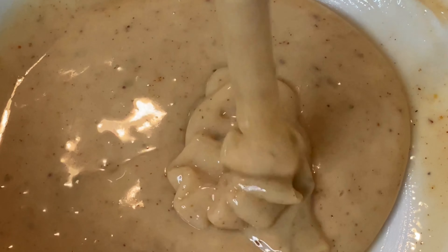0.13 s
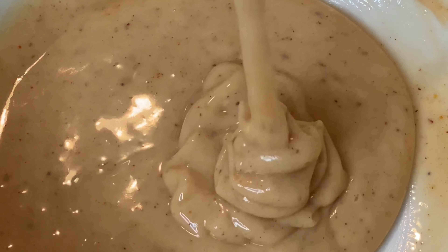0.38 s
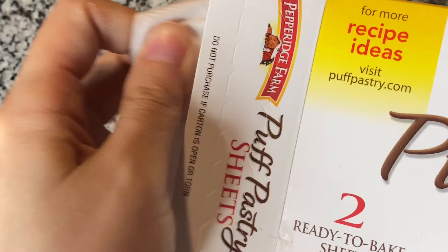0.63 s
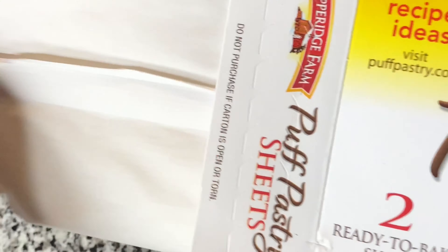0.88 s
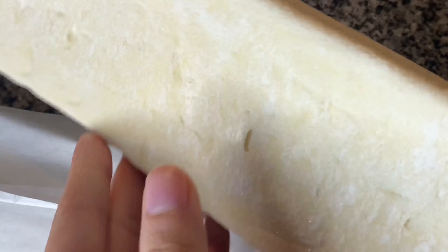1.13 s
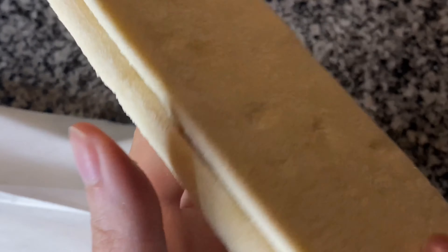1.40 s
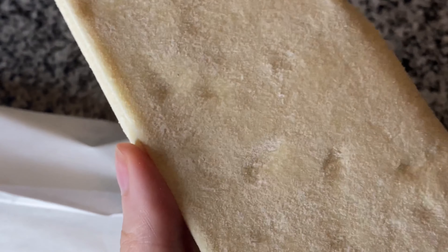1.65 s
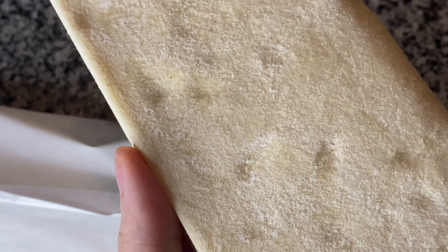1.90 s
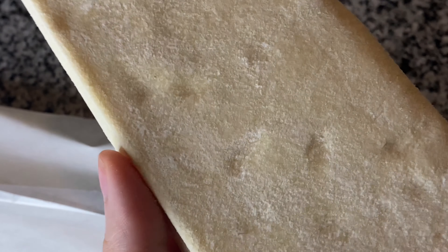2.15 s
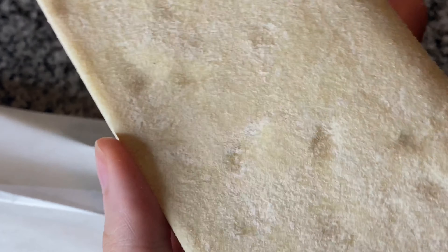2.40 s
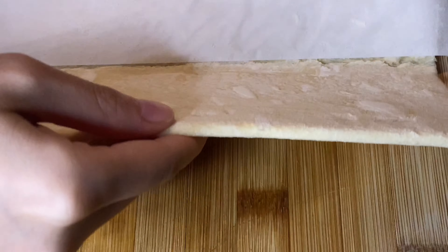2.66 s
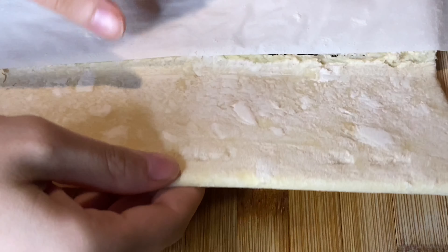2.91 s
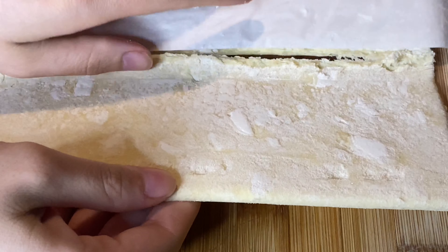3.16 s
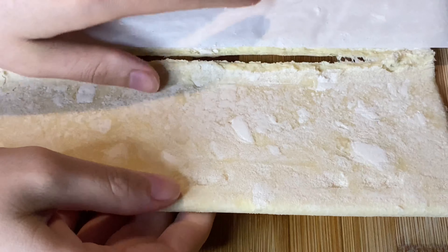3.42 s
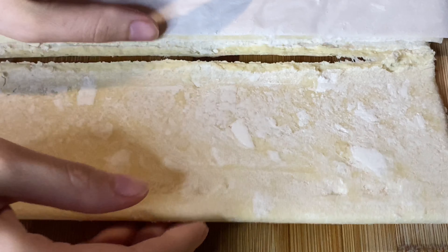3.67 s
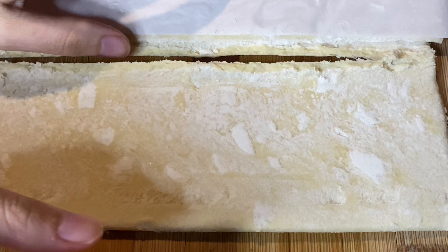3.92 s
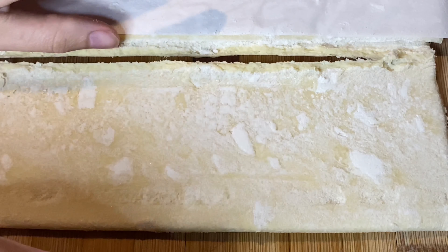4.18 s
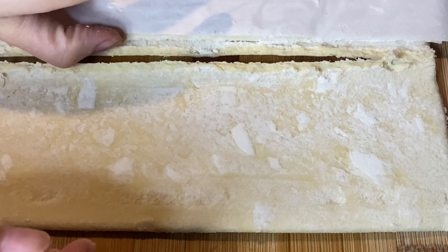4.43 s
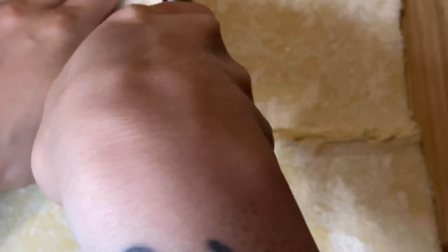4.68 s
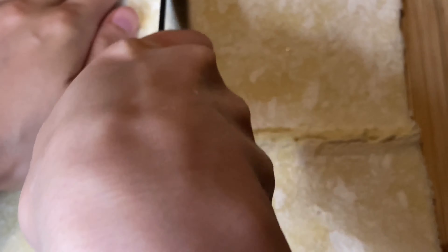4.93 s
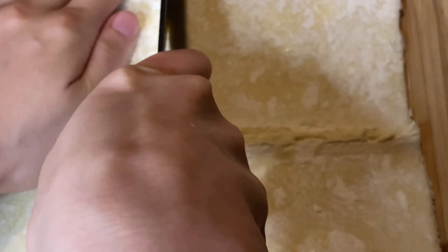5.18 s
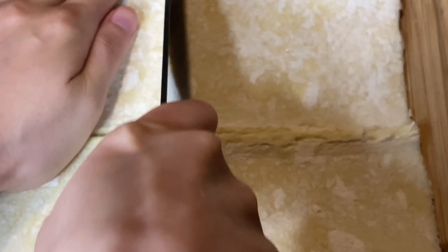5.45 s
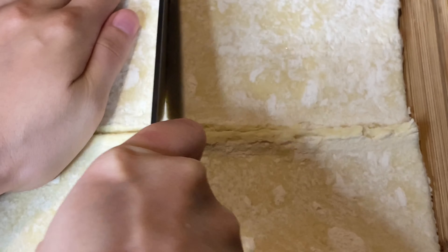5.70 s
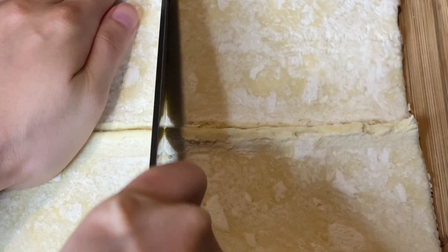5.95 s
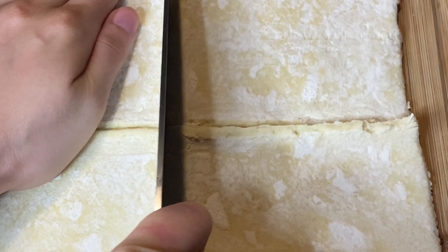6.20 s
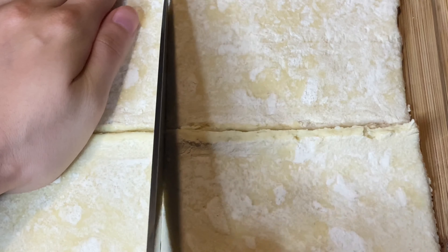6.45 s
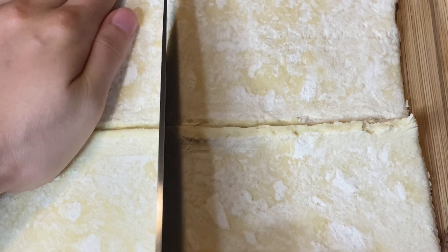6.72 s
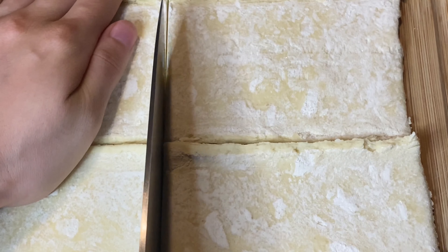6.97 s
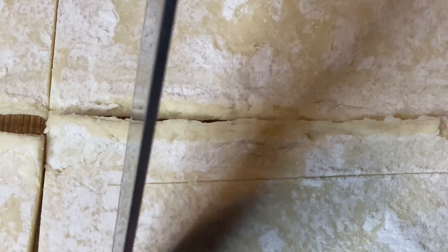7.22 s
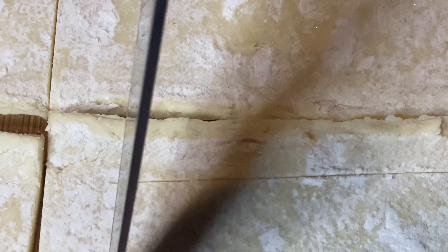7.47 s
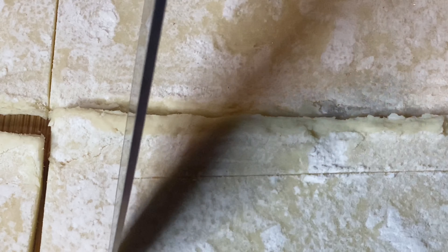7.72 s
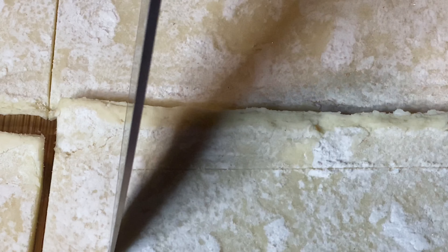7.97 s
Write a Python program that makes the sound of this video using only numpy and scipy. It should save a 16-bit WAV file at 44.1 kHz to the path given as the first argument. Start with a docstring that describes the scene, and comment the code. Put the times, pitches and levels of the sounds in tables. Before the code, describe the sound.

In a small kitchen, recorded very close in stereo with abrupt changes of background at each cut, paper wrapping scrapes from a carton, growing rougher and brighter. Soft skin rubs come next, then a single hard snap of frozen dough and papery rustles. A low hum continues while a blade saws gently, clacks against a wooden board, and finally makes only faint slides.

```python
"""A frozen pastry sheet in close kitchen shots: its fold cracks open in gliding wavelets and a splintery burst,
a knife saws through it as slips ringing blade modes, and blows ring a wooden board.
Earlier its wrapper scrapes out of a hollow carton and fingers brush dough and paper, all as shaped grit.
An appliance hums over air noise that is set anew at each hard cut; a small tiled room answers each blow,
and two microphone ports pick it all up."""
import sys
import numpy as np
from scipy import signal
from scipy.fft import rfft, irfft
from scipy.io import wavfile
from scipy.ndimage import uniform_filter1d

SR = 44100
rng = np.random.default_rng(int(sys.argv[2]) if len(sys.argv) > 2 else 0)


def attenuation_scalar(level_db):
    """Turn a level in dB into a linear amplitude multiplier (20 dB per decade)."""
    decades = np.asarray(level_db, float) / 20
    return 10 ** decades


def transcribe(signal):
    """Save signal, clipped to [-1, 1], as a 16-bit WAV file at the path in sys.argv[1]."""
    frames = np.atleast_2d(signal).T
    limited = np.clip(frames, -1, 1)
    pcm = np.round(limited * 32767).astype(np.int16)
    wavfile.write(sys.argv[1], SR, pcm)


N = 357210
T = np.arange(N) / SR
HZ = np.fft.rfftfreq(N, 1 / SR)

# shots and their room tone: start_s, then level_db at each anchor pitch
SHOTS = [(0, -104, -96, -88.5, -77), (0.445, -89.5, -85.5, -90.5, -72.5), (1.078, -87.5, -85.5, -83, -77),
         (2.538, -82, -79.5, -79, -77), (4.639, -79.5, -81, -74.5, -76.5), (7.248, -85.5, -80.5, -77, -76)]
# the anchor pitches: pitch_hz
ANCHORS_HZ = [28, 110, 600, 4500]
# basic spectrum of the room tone: pitch_hz, level_db (per Hz)
AIR = [(25, -9), (55, 0.0), (100, -6), (200, -7.5), (330, -18.5), (600, -17.5), (1000, -29.5),
       (1600, -38.5), (2500, -46), (4500, -47.5), (8000, -54.5), (12000, -54), (15500, -59.5)]
# likeness of the air noise at the two ports: pitch_hz, likeness (0 to 1)
AIR_SAME = [(60, 0.97), (300, 0.93), (1000, 0.27), (3000, .6), (9000, .7), (11300, 0.69), (16000, 1)]
# bumps over the room tone: pitch_hz, width_hz, level_db
DRONES = [(53, 16, -1), (130, 13, 6), (255, 23, 0), (312, 28, 7.5), (720, 17, 0.5)]
# brief dips of the hum: time_s, level_db, half_width_s
HUM_DIPS = [(3.82, -15.5, .06), (6.6, -11, 0.091), (7.88, -14, 0.092), (8.1, -22, 0.079)]
# a fainter hum beside the first: pitch_hz, level_db, start_s, end_s
SECOND_HUM = (147.5, -66, 2.5, 4.5)
HUM_HZ, HUM_FROM_S, HUM_DB = 133, 2.54, -57
WAVER_DB, WAVER_S = 2.5, 0.18  # random spread of the hum level, and its averaging time
THROB_HZ, THROB_S, THROB_DB = 57, 4.64, -55.5
THROB_RISE_S, THROB_FADE_DB_PER_S = .05, 17.5

# decay of the tiled room: pitch_hz, t60_s
ROOM = [(200, 0.62), (530, 0.39), (1400, 0.45), (3700, 0.53), (9000, 0.24)]
# likeness of the echoes at the two ports: pitch_hz, likeness (0 to 1)
ROOM_SAME = [(100, 1), (400, .6), (1500, .5), (5000, 0.045), (9500, 0.17), (11300, 0.3), (16000, 1)]
# phase by which the left port leads: pitch_hz, lead_rad
LEAD = [(0, 0), (340, -0.1), (600, 2.8), (1460, -0.1), (2070, 0.4), (2930, 2.0), (3960, 1.1), (4650, 2.4),
        (5430, 6.8), (7410, 7.5), (7670, 7.8), (9470, 8.1), (11100, 9.3), (11600, 9.4)]
# level of the left port over the right: pitch_hz, level_db
LEAN = [(60, -4.5), (110, -6.0), (190, -6.5), (350, -13.5), (620, -3.5), (1110, 1.5), (1990, -3.0),
        (3560, -5.0), (6390, -1.5), (11400, 0.5)]

# dry ticks of paper and flour: time_s, peak_db
TICKS = [(0.181, -67), (1.905, -63), (1.918, -56), (2.933, -59), (3.3046, -29), (3.3665, -45),
         (4.33, -58.5), (4.45, -65.5), (4.6125, -52)]
# small hollow taps: time_s, peak_db, pitch_hz
TAPS = [(1.134, -54, 1800), (1.1671, -52.5, 1210), (4.907, -51, 4320), (5.415, -54.5, 996),
        (6.002, -51, 1870), (8.05, -62.5, 2186)]
TICK_HZ, TAP_RISE_S = 8900, 0.0011

# skin on dough: pitch_hz, level_db (relative, per Hz)
DOUGH = [(500, 4), (1200, -3), (2000, -3), (3500, -2.5), (5000, -8), (7000, -19.5), (10000, -25.5),
         (13000, -22.5), (15500, -24)]
# skin on paper: pitch_hz, level_db (relative, per Hz)
PAPER = [(1000, -19.5), (2000, -29), (3000, -21.5), (4500, -4.5), (6000, 5.5), (8000, 4), (10000, 8.5),
         (13000, -1.5), (15500, -3.5)]
# brushes of the hand: start_s, length_s, dough_db, paper_db
BRUSHES = [(1.099, .1, -70.5, -72.5), (1.2, .12, -78, -73.5), (1.328, 0.05, -59.5, -81),
           (1.374, .08, -65, -79), (1.398, .07, -81.5, -72.5), (1.542, .045, -72.5, -76),
           (1.654, .1, -69.5, -88.5), (2.237, .08, -79.5, -89.5), (2.418, 0.1, -67.5, -65),
           (2.538, 0.03, -79.5, -66), (2.57, 0.049, -89, -66), (2.619, .06, -86.5, -67),
           (2.694, 0.15, -80.5, -68.5), (3.03, .05, -72.5, -76), (3.083, .035, -75, -71.5),
           (3.143, .042, -68, -60), (3.195, .045, -78.5, -64), (3.267, .06, -75, -58.5),
           (3.335, .045, -76.5, -61), (3.371, .065, -81, -78), (3.561, .025, -67, -59.5),
           (3.575, .055, -71.5, -57), (3.665, .035, -80.5, -69), (3.747, .03, -95, -84),
           (4.31, .055, -85, -77.5), (4.43, .13, -95, -94)]
BRUSH_RISE, STROKE_RISE = .3, 0.51  # share of a gesture spent swelling
LEAD_IN_S, TRAIL_S = .015, .04  # fade before and after a gesture
EDGE_DB, HUSH_DB = -12, -40.5  # under the peak: at a gesture's two edges, and at the far ends of its fades

# wrapper rubbing on carton: pitch_hz, level_db (relative, per Hz)
CARD = [(60, -11), (150, -6.5), (320, -3.5), (600, -1), (1100, -1.3), (2000, 1), (3000, 0), (4500, -4),
        (6500, -4.5), (10000, -6.5), (13000, -13), (15500, -4)]
# resonances of the hollow box: pitch_hz, width_hz, level_db
CARTON = [(1830, 12, -5.5), (2070, 17, -0.5), (2700, 18, -8), (5170, 740, -6.5), (6300, 57, -13.5),
          (6630, 35, -2.5)]
# pull on the wrapper: time_s, level_db
PULL = [(0.445, -44), (.46, -41), (.49, -48), (0.635, -34.5), (0.677, -43), (0.83, -29), (0.867, -34.5),
        (1.073, -40.5), (1.077, -43)]
# catches of wrapper on carton: time_s, peak_db, pitch_hz
CATCHES = [(0.456, -35, 970), (.556, -31, 1077), (0.6345, -26, 1750), (.739, -24.5, 2008),
           (0.752, -28, 1770), (0.77, -23.5, 1376), (0.814, -19, 1418), (0.825, -21, 1952),
           (0.83, -16.5, 2000), (0.836, -13.5, 2100), (0.849, -20.5, 2300), (0.853, -24, 2400)]
BRIGHTER, EASY_DB = .2, -39.5  # per dB of pull over an easy one: dB added to the treble and taken from the body

# blade dragging through frozen dough: pitch_hz, level_db (relative, per Hz)
SAW = [(500, 4.5), (900, 14), (1350, -6), (1850, 2), (3000, -3.5), (4500, -22), (7000, -14.5), (10000, -15),
       (15500, -24.5)]
# bending modes of the blade: pitch_hz, width_hz, level_db
BLADE = [(990, 470, -4), (1820, 190, 1.5), (2490, 53, -10), (3070, 170, -3.5), (3840, 52, -18),
         (4680, 340, -7), (6010, 106, -6.5), (7250, 160, -10)]
# pushes and pulls of the blade: start_s, length_s, level_db
STROKES = [(4.646, 0.023, -68), (4.871, 0.097, -61), (5.125, 0.074, -70), (5.327, 0.17, -60.5),
           (5.64, .1, -79), (5.728, 0.059, -70), (5.877, 0.14, -61.5), (6.119, 0.057, -68.5),
           (6.345, 0.1535, -62), (6.464, 0.33, -67), (7.174, 0.102, -56), (7.463, .16, -75.5),
           (7.89, .11, -79.5)]
FIRM_DB, DULLER, EDGE_HZ = -61, .8, 3800  # above EDGE_HZ a stroke loses DULLER dB per dB under a firm one
# the blade catches in the dough: time_s, level_db, corner_hz
NICKS = [(4.6469, -57, 6970), (5.0516, -51, 8020), (5.1178, -53, 4000)]
NICK_S, DAMPING_HZ = 0.00033, 350  # contact length; the dough widens each blade mode

# modes of board and blade together: pitch_hz, level_db, t60_s
BOARD = [(139, 4.5, 0.043), (260, -3.5, 0.043), (383, -7, 0.048), (462, -0.5, 0.076), (884, 7, 0.048),
         (1153, 5, 0.022), (1314, 6.5, 0.015), (1468, -0.5, 0.015), (1867, 9, 0.0061), (2300, 1.5, 0.014),
         (3140, 6, 0.0061), (3210, -2.5, 0.0072), (4150, -11.5, 0.0034), (4300, -5, 0.006),
         (4560, -6, .008), (5940, -10, 0.014), (7400, -39, .012)]
# blows on the board, too soft to excite above the corner: time_s, level_db, corner_hz, grinding_s
KNOCKS = [(6.2074, -42.5, 300, 0.00083), (6.2147, -39, 1840, 0.011), (6.237, -42.5, 1927, 0.0065),
          (6.6173, -37, 715, 0.0079), (6.6717, -26.5, 3900, 0.015)]

# snap of the frozen fold: delay_s, pitch_hz, peak_db, rise_s, fall (octaves per rise time), room_send_db
CRACK = [(.0002, 2097, -5, .0012, .18, -18.5), (.0012, 1150, -8.5, .0013, 0.26, -15),
         (.003, 620, -17.5, 0.0012, 0.301, -11), (.004, 210, -27, 0.0038, 0.023, -13),
         (.0006, 3200, -22.5, 0.00024, 0.028, -5)]
# sharp edge of the crack: level_db, corner_hz, length_s
SPLINTERS = (-20, 10000, .004)
CRACK_S, SPLINTERS_ROOM_DB = 2.7569, -9


def read(points, hz):
    """A table read on a log-frequency axis."""
    f, value = np.transpose(points)
    return np.interp(np.log(hz + 1), np.log(f + 1), value)


def peaks(modes):
    """Power sum of resonance curves."""
    return np.sqrt(sum(attenuation_scalar(db) ** 2 / (1 + (2 * (HZ - hz) / width) ** 2) for hz, width, db in modes))


def colour(x, gain, lo_hz, hi_hz):
    """Filters x so that the band lo-hi has rms 1 in the average of two ports that differ only in phase."""
    z = rfft(x) * gain
    middle = np.cos(.5 * read(LEAD, HZ)) * z * (HZ > lo_hz) * (HZ < hi_hz)
    rms = np.sqrt(2 * np.sum(abs(middle) ** 2)) / N
    return irfft(z, N) / rms


def treble(x, hz):
    """The part of x above hz, by a gentle slope."""
    return irfft(rfft(x) * HZ ** 2 / (HZ ** 2 + hz ** 2), N)


def wander(length_s):
    """Slow random drift with a spread of 1: noise averaged over length_s."""
    return uniform_filter1d(rng.standard_normal(N), round(length_s * SR)) * np.sqrt(length_s * SR)


def grit(per_s, spread_db, clump_db, clump_s):
    """Tiny slips of random size that come in clumps."""
    clump = wander(clump_s)
    size = attenuation_scalar(spread_db * np.minimum(rng.exponential(1, N), 4) + clump_db * clump)
    happens = rng.random(N) < per_s / SR
    return size * happens * rng.standard_normal(N)


def blip(hz, db, rise, fall=0.):
    """A wavelet whose envelope peaks at db after the rise time and then dies away, its pitch sliding down."""
    u = np.arange(2000) / SR / rise
    envelope = attenuation_scalar(db) * (u * np.exp(1 - u)) ** 2
    phase = 2 * np.pi * np.cumsum(hz * 2 ** (-fall * u)) / SR
    return envelope * np.sin(phase)


def grind(crumbs, db, corner_hz, length):
    """A burst of contact force: one sharp start, then crumbs, strongest in the octaves under the corner."""
    force = crumbs * np.exp(-(np.arange(len(crumbs)) / SR / length) ** 4)
    force[0] = 3  # the sharp start
    band = signal.butter(2, [corner_hz / 7, corner_hz], "band", fs=SR)
    return attenuation_scalar(db) * signal.lfilter(*band, force / np.linalg.norm(force))


def swells(starts, lengths, levels_db, rise):
    """Each gesture starts quickly, swells to its peak, sags and stops, or is cut with its shot."""
    out = np.zeros(N)
    for start, length, db in zip(starts, lengths, levels_db):
        peak = np.clip(rise, .05, .95) * length
        times = start + np.array([-LEAD_IN_S, 0, peak, length, length + TRAIL_S])
        end = min([times[-1]] + [row[0] for row in SHOTS if row[0] > start])
        near = slice(round(times[0] * SR), round(end * SR))
        out[near] += attenuation_scalar(db + np.interp(T[near], times, [HUSH_DB, EDGE_DB, 0, EDGE_DB, HUSH_DB]))
    return out


def add(mix, s, sound):
    """Mixes a sound in at time s."""
    part = mix[round(s * SR):][:len(sound)]
    part += sound[:len(part)]


def room_tone():
    """Steady air and appliance noise, set anew at each cut, partly shared by the ports."""
    a, b = rfft(rng.standard_normal((2, N)))
    same = np.clip(read(AIR_SAME, HZ), 0, 1)
    both = np.array([a, same * a + np.sqrt(1 - same ** 2) * b])
    out = np.zeros((2, N))
    for start, *levels in SHOTS:
        tone_db = read(AIR, HZ) + read(list(zip(ANCHORS_HZ, levels)), HZ)
        gain = attenuation_scalar(tone_db) * np.sqrt(1 + peaks(DRONES) ** 2)
        out[:, T >= start] = irfft(gain * both, N)[:, T >= start]
    return np.sqrt(SR / 2) * out  # from level per Hz to sample level


def hums():
    """Sines: a wavering hum, its steady neighbour and a deep throb that fades."""
    dips = sum(db * np.exp(-((T - s) / width) ** 2) for s, db, width in HUM_DIPS)
    hum_level = (T >= HUM_FROM_S) * attenuation_scalar(HUM_DB + WAVER_DB * wander(WAVER_S) + dips)
    hum = hum_level * np.sin(2 * np.pi * HUM_HZ * T)
    hz, db, start, end = SECOND_HUM
    second = (T >= start) * (T < end) * attenuation_scalar(db) * np.sin(2 * np.pi * hz * T)
    age = np.maximum(T - THROB_S, 0)
    throb_level = np.minimum(age / THROB_RISE_S, 1) * attenuation_scalar(THROB_DB - THROB_FADE_DB_PER_S * age)
    throb = throb_level * np.sin(2 * np.pi * THROB_HZ * T)
    return np.sqrt(2) * (hum + second + throb)  # levels are rms


def kitchen(x):
    """Sparse reflections dying band by band; each cut ends the tail of its shot."""
    taps = np.zeros((2, SR // 2))
    # one echo at random in every 20 samples
    at = np.arange(120, SR // 2 - 20, 20) + rng.integers(0, 20, (2, (SR // 2 - 121) // 20))
    np.put_along_axis(taps, at, rng.choice([-1., 1.], at.shape), 1)
    hz, t, z = signal.stft(taps, SR, nperseg=256)
    same = np.clip(read(ROOM_SAME, hz), 0, 1)[:, None]
    z = np.array([z[0], same * z[0] + np.sqrt(1 - same ** 2) * z[1]])
    z = z * attenuation_scalar(-60 * t / read(ROOM, hz)[:, None])
    tail = signal.istft(z, SR, nperseg=256)[1]
    tail /= np.linalg.norm(tail[0])
    cuts = [round(row[0] * SR) for row in SHOTS] + [N]
    shots = [signal.fftconvolve(x[None, a:b], tail, axes=1)[:, :b - a] for a, b in zip(cuts, cuts[1:])]
    return np.hstack(shots)


def clicks():
    """Dry ticks and small hollow taps, each one short wavelet."""
    out = np.zeros(N)
    for s, db in TICKS:
        add(out, s, blip(TICK_HZ, db, .8 / TICK_HZ))
    for s, db, hz in TAPS:
        add(out, s, blip(hz, db, TAP_RISE_S))
    return out


def carton():
    """The wrapper scrapes along the hollow box, catching now and then; hard scraping is brighter."""
    gain = attenuation_scalar(read(CARD, HZ)) * np.sqrt(0.51 + peaks(CARTON) ** 2)
    whole = colour(grit(14000, 3., 2., .004), gain, 500, 11000)
    top = treble(whole, 3500)
    pull_s, level_db = np.transpose(PULL)
    pull_db = np.interp(T, pull_s, level_db, left=-150, right=-150)  # silent before and after the pull
    bright = attenuation_scalar(np.clip(BRIGHTER * (pull_db - EASY_DB), -12, 12))
    out = attenuation_scalar(pull_db) * ((whole - top) / bright + top * bright)
    for s, db, hz in CATCHES:
        thud = blip(hz, db, 1.3 / hz)
        dry_edge = blip(6500, db - 12, .0001)
        add(out, s, thud + dry_edge)
    return out


def fingers():
    """Skin drags dully over dough and hisses over paper."""
    start, length, dough_db, paper_db = np.transpose(BRUSHES)
    drag = colour(grit(25000, 1.5, 1.5, .006), attenuation_scalar(read(DOUGH, HZ)), 1400, 4700)
    hiss = colour(grit(20000, 2.5, 2.5, .006), attenuation_scalar(read(PAPER, HZ)), 4984, 11000)
    dough = swells(start, length, dough_db, BRUSH_RISE) * drag
    paper = swells(start, length, paper_db, BRUSH_RISE) * hiss
    return dough + paper


def knocks():
    """Grinding blows ring the board and clatter directly."""
    out, t = np.zeros(N), np.arange(6000) / SR
    ring = sum(attenuation_scalar(db - 60 * t / t60) * np.sin(2 * np.pi * hz * t) for hz, db, t60 in BOARD)
    ring[0] = attenuation_scalar(28)  # the broad clatter between the modes
    for s, *contact in KNOCKS:
        force = grind(rng.standard_normal(2000), *contact)
        add(out, s, signal.fftconvolve(force, ring))
    return out


def nicks():
    """Short catches ring the damped blade."""
    out, t = np.zeros(N), np.arange(1000) / SR
    ring = np.zeros(len(t))
    for hz, width, db in BLADE:
        ring += attenuation_scalar(db) * np.exp(-np.pi * (width + DAMPING_HZ) * t) * np.sin(2 * np.pi * hz * t)
    ring[0] = attenuation_scalar(14)  # the bare click
    for s, db, corner_hz in NICKS:
        force = grind(rng.standard_normal(2000), db, corner_hz, NICK_S)
        add(out, s, signal.fftconvolve(force, ring))
    return out


def knife():
    """Sawing slips ring the blade's bending modes over a broad scrape; light strokes are duller."""
    gain = np.sqrt((.35 * attenuation_scalar(read(SAW, HZ))) ** 2 + peaks(BLADE) ** 2)
    whole = colour(grit(10000, 2.8, 2., .006), gain, 1400, 9000)
    top = treble(whole, EDGE_HZ)
    start, length, db = np.transpose(STROKES)
    top_db = db + DULLER * np.minimum(db - FIRM_DB, 0)
    body = swells(start, length, db, STROKE_RISE) * (whole - top)
    return body + swells(start, length, top_db, STROKE_RISE) * top


def crack():
    """The frozen fold snaps in falling wavelets and one short splintery burst: direct sound, then room send."""
    parts = [(delay, blip(*shape), room_db) for delay, *shape, room_db in CRACK]
    parts.append((.001, grind(rng.standard_normal(2000), *SPLINTERS), SPLINTERS_ROOM_DB))
    direct, send = np.zeros((2, N))
    for delay, sound, room_db in parts:
        add(direct, CRACK_S + delay, sound)
        add(send, CRACK_S + delay, attenuation_scalar(room_db) * sound)
    return direct, send


def scene():
    """Near rubbing is almost dry; blows fill the room."""
    rubs = fingers() + knife() + nicks() + clicks()
    box, blows = carton(), knocks()
    snap, snap_send = crack()
    send = attenuation_scalar(-15) * rubs + attenuation_scalar(-7.5) * box + snap_send + attenuation_scalar(-4.0) * blows
    return rubs + box + snap + blows + kitchen(send) + room_tone() + hums()


def ports(left, right):
    """The two microphone ports differ in phase and level at each pitch."""
    half = np.exp(.5j * read(LEAD, HZ)) * attenuation_scalar(.5 * read(LEAN, HZ))
    return irfft(np.array([rfft(left) * half, rfft(right) / half]), N)


def low_pass(x):
    """Removes everything above the highest recorded frequency."""
    return signal.sosfilt(signal.butter(12, 15900, fs=SR, output="sos"), x)


def record(dry):
    """The two ports pick up the scene."""
    mix = ports(*dry)
    return low_pass(mix)


dry = scene()
out = record(dry)
transcribe(out)
```